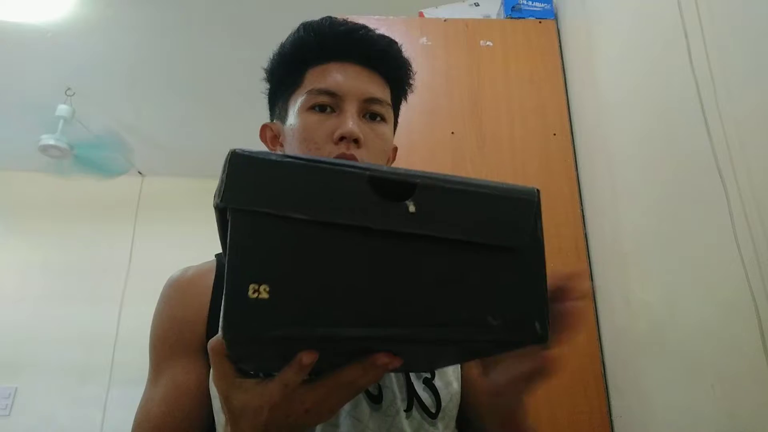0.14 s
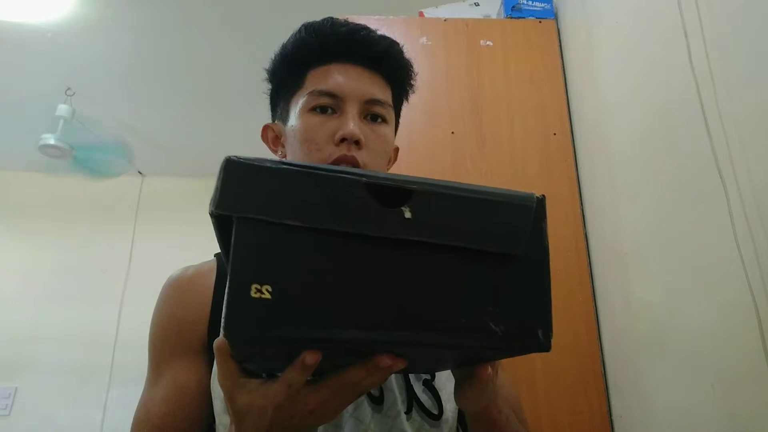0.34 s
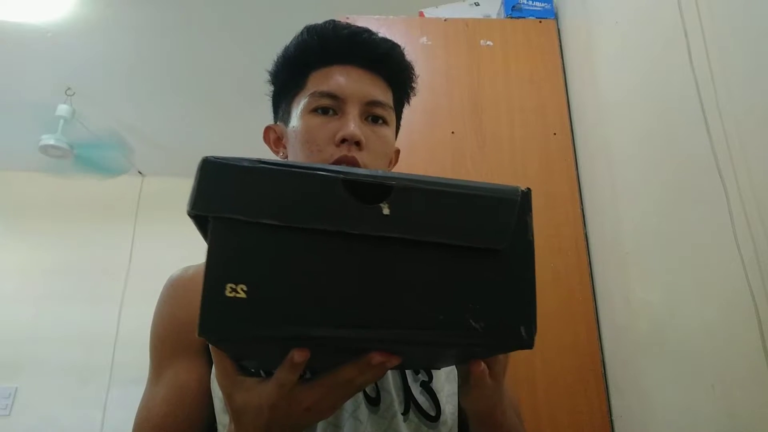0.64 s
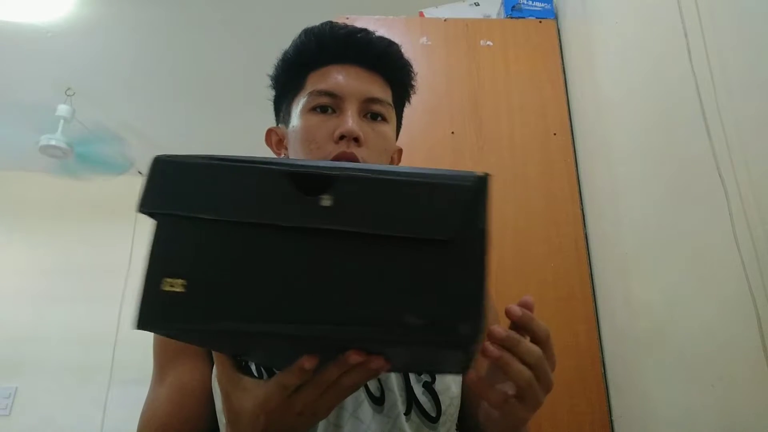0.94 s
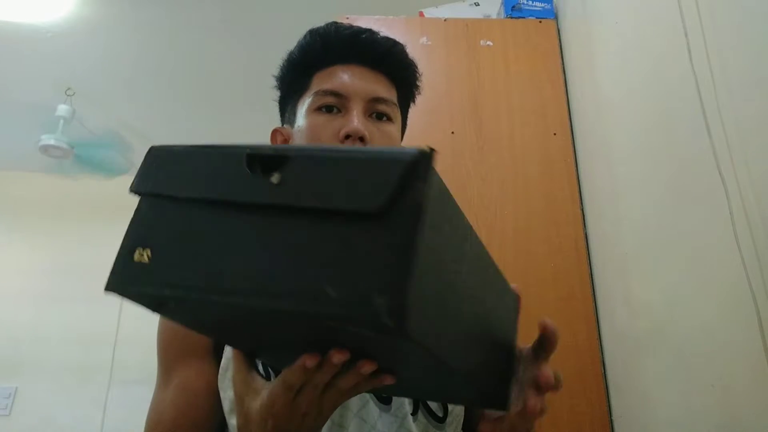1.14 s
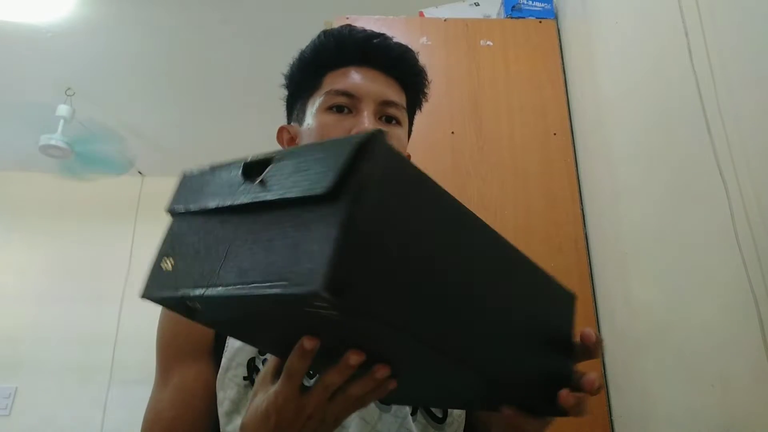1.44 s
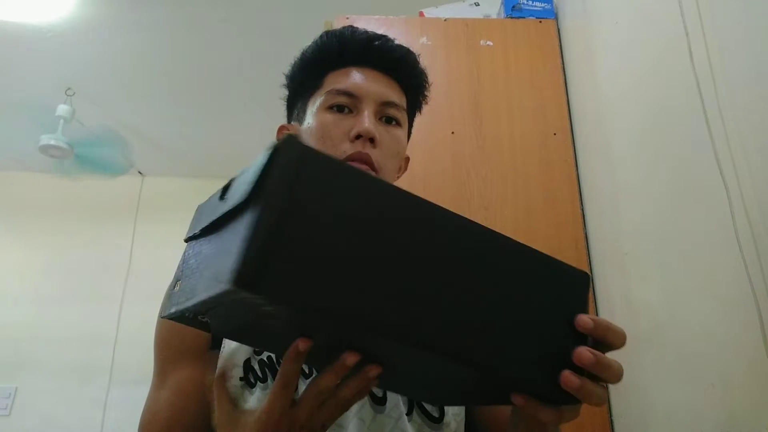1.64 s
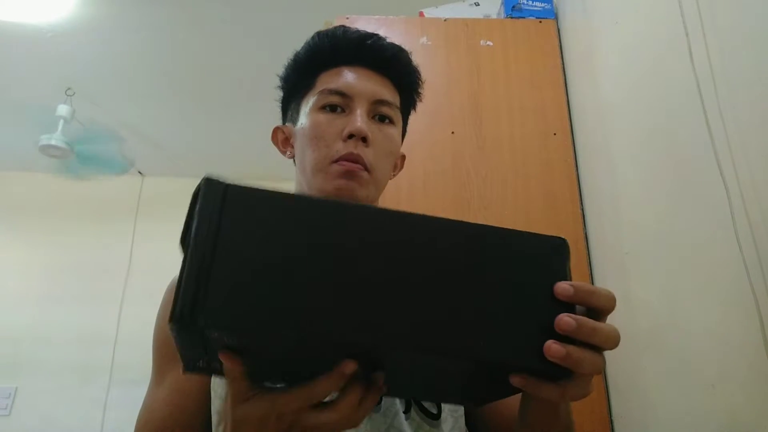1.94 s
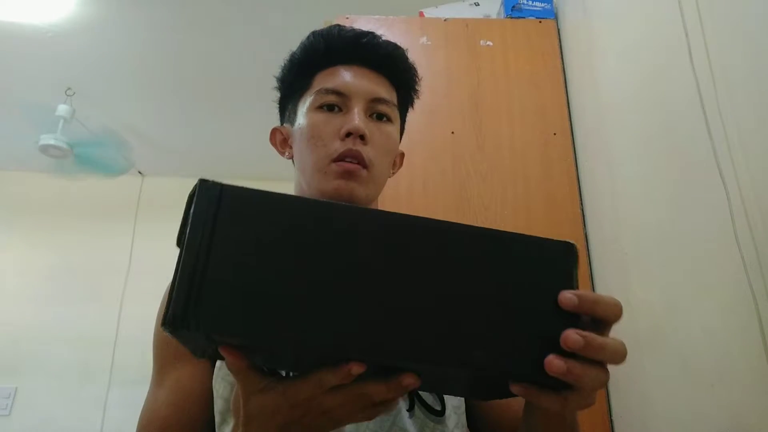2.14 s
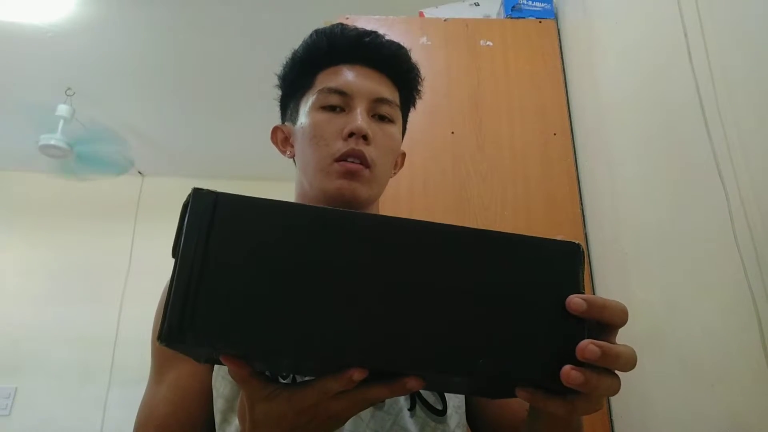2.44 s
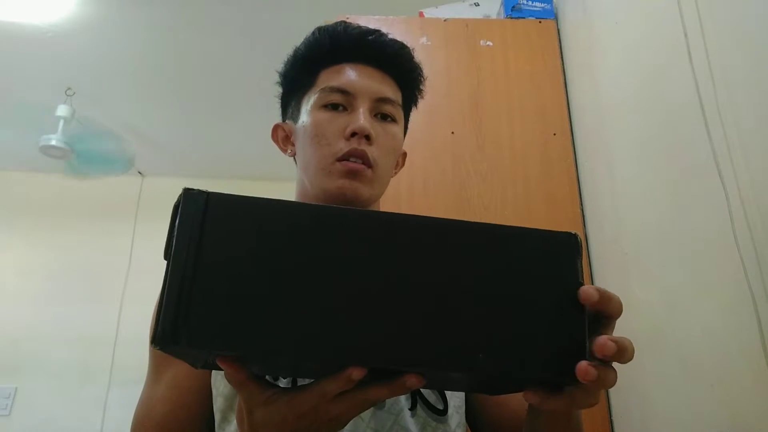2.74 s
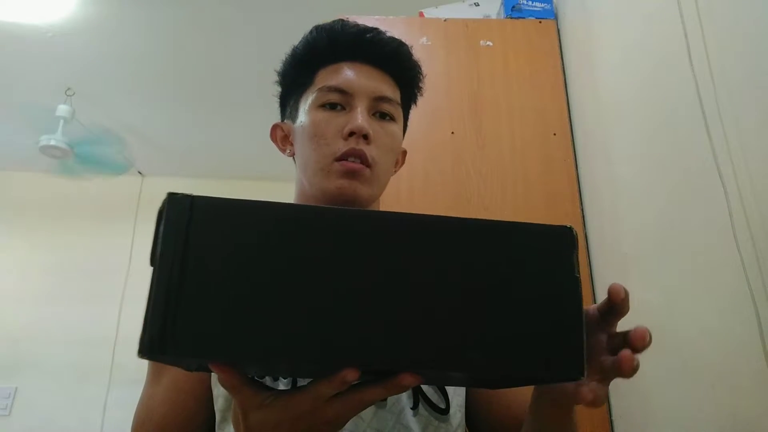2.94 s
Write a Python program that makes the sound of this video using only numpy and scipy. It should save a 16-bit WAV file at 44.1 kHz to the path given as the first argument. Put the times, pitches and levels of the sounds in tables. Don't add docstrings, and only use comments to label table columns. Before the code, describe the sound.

A cardboard box gets a hollow slap and a bright lid click, followed by dull knocks, dry ticks and brief palm rubs, close-miked in a small room with constant low fan hum and soft air hiss.

```python
import sys
import numpy as np
from scipy import signal
from scipy.fft import rfft, irfft
from scipy.io import wavfile

SR = 44100
rng = np.random.default_rng(int(sys.argv[2]) if len(sys.argv) > 2 else 0)


def magnitude_from_level(level_db):
    exponent = np.asarray(level_db, float) / 20
    return 10 ** exponent


def to_wav(s):
    ch = np.atleast_2d(s).T
    pcm = np.round(np.clip(ch, -1, 1) * 32767)
    wavfile.write(sys.argv[1], SR, pcm.astype(np.int16))


N = 136710

# pitch_hz, t60_s
ROOM_T60 = [(200, 0.27), (1000, 0.18), (4000, 0.25), (12000, .15)]
# pitch_hz, density_db (per Hz)
RUMBLE = [(20, -16), (60, -14), (90, -3), (170, 0.6), (400, -4.5), (800, -9), (1500, -14), (2200, -48)]
# pitch_hz, density_db (per Hz)
HISS = [(820, -28), (1400, -3), (2040, -4.5), (2620, -1), (3120, -4.5), (6150, -18), (7920, -17),
        (12600, -40), (15800, -38)]
# cycles_per_turn, level_db
HUM = [(26, -41), (27, -45), (28, -52), (29, -40), (30, -21), (31, -42), (32, -42), (33, -39), (34, -39),
       (35, -46), (52, -55), (54, -56), (55, -43), (56, -53), (59, -49), (60, -42), (61, -47), (62, -51)]
# cycles_per_turn, level_db
BUZZ = [(89, -55), (90, -50), (91, -61), (118, -54), (120, -41), (123, -57), (149, -51), (151, -44),
        (152, -43), (154, -51), (178, -54), (179, -51), (180, -59), (210, -60), (212, -60), (239, -62),
        (241, -58), (269, -60), (270, -61), (271, -61), (272, -64), (298, -67), (301, -67), (331, -67)]
# pitch_hz, width_hz, level_db
HOUSING = [(106.9, 9.8, -41), (133.9, 23, -32.5), (232.7, 41, -42), (295.5, 40, -46.5), (480, 34, -46),
           (604.3, 60, -43.5), (864, 43, -58.5), (1082, 53, -53.5), (1310, 60, -60), (1642, 56, -57)]
# time_s, level_db
SHADE = [
    (0, 2),
    (.5, -1.9),
    (1.2, -1.4),
    (1.9, -0.64),
    (2.5, 1.05),
    (3.1, 1.5),
]
# time_s, level_db
RUB = [
    (0, -75),
    (1.26, -90),
    (1.32, -61),
    (1.55, -45.5),
    (1.8, -64.5),
    (1.97, -42),
    (2.15, -59),
    (2.35, -66),
    (3.1, -62),
]
# pitch_hz, density_db (per Hz)
RUB_COLOUR = [(1500, -16), (4000, 6), (6000, 0), (8200, 2.5), (10500, -3), (13000, -12), (15300, -10),
              (16500, -15)]
# pitch_hz, density_db (per Hz)
CRACK_COLOUR = [(500, 12), (2000, -1.5), (4500, 2.5), (6000, -6), (8000, 0.1), (10500, -9.5), (13000, -16),
                (15500, -14)]
# start_s, peak_db, centre_hz
TICKS = [(0.0555, -34, 5630), (0.159, -39, 7910), (0.7562, -47, 6690), (0.797, -41, 5100),
         (0.855, -42, 5870), (0.913, -35, 8200), (0.9264, -36, 7800), (1.295, -38, 5460),
         (1.313, -37, 5890), (1.3369, -34.5, 6800), (1.3867, -34, 5500), (1.5644, -37, 6920),
         (1.7794, -38, 5830), (1.8896, -32.5, 7400), (1.926, -36, 7740), (2.0282, -34, 7920),
         (2.0784, -34, 5700), (2.1344, -39, 7640), (2.198, -47, 5080), (2.2693, -25, 8700),
         (2.319, -35, 5380), (2.3715, -45, 5100), (2.6763, -36.5, 5320), (2.969, -38, 7600)]
# start_s, peak_db, pitch_hz
KNOCKS = [(0.344, -25, 610), (0.978, -22.5, 620), (1.049, -18.5, 602), (1.29, -20, 616), (1.401, -21, 910),
          (1.697, -22, 603), (1.773, -21.5, 647), (1.818, -16, 512), (1.834, -18, 608), (1.934, -19, 594),
          (2.039, -19.5, 600), (2.23, -20, 620)]
# start_s, length_s, pitch_hz, level_db
SQUEAKS = [
    (1.93, .012, 1700, -38),
    (1.966, 0.012, 1547, -28.5),
    (2.218, .02, 2540, -44),
]
# start_s, length_s, start_hz, end_hz, level_db
WHISTLES = [
    (2.21, .025, 11300, 12300, -60),
    (2.342, .012, 12300, 12000, -61),
    (2.365, .016, 12500, 12200, -62),
    (2.382, .04, 11600, 10800, -60),
]
# start_s, peak_db
SNAP_TICK = [
    (.4495, -13),
    (.4505, -16.5),
]
# start_s, peak_db
SNAP_RING = [
    (.4560, -18),
    (0.4581, -18),
    (.464, -32),
]
# pitch_hz, level_db, t60_s
LID = [(1065, -3.5, 0.08), (1315, -2, 0.06), (1640, 0.1, 0.04), (2283, -4, 0.088), (3370, -12, 0.052),
       (4300, -5, 0.052), (6290, -12, .05), (8269, -20, 0.044)]
# start_s, peak_db
SLAPS = [
    (.2872, -13.5),
    (.2882, -9),
    (.299, -11.5),
    (.326, -18.5),
]
# pitch_hz, level_db, t60_s
BOX = [(178, -5.5, 0.1), (249, -2.5, 0.11), (306.6, 0.5, 0.086), (475.6, -4.5, 0.079), (680, -11, 0.098),
       (880, -9, 0.13), (1137, -6.5, 0.084), (1397, -5.5, 0.056), (1954, -22, 0.055), (2630, -11.5, 0.062),
       (3130, -17, 0.082), (4490, -15.5, 0.064)]


def at_hz(points, hz):
    table_hz, value = np.array(points).T
    return np.interp(np.log(hz), np.log(table_hz), value)


def in_time(rows):
    return np.interp(np.arange(N) / SR, *np.transpose(rows))


def rms_one(x):
    return x / np.sqrt(np.mean(x ** 2) + 1e-20)


def drift(rate_hz):
    hop = 40
    pole = np.exp(-2 * np.pi * rate_hz * hop / SR)
    noise = rng.standard_normal(N // hop + 2002)
    slow = signal.lfilter([1], [1, -2 * pole, pole * pole], noise)[2000:]
    return np.interp(np.arange(N) / hop, np.arange(len(slow)), rms_one(slow))


def ring(force, pitch_hz, t60_s):
    radius = magnitude_from_level(-60 / (t60_s * SR))
    step = 2 * np.pi * pitch_hz / SR
    return signal.lfilter([0, np.sin(step)], [1, -2 * radius * np.cos(step), radius * radius], force + 1e-18)


def bands(x):
    edges = 20 * 2 ** np.arange(0, 9.9, 1 / 3)
    for low, high in zip(edges, edges[1:]):
        sos = signal.butter(2, [low, high], "band", fs=SR, output="sos")
        yield np.sqrt(low * high), signal.sosfilt(sos, x)


def colour(x, spectrum):
    hz = np.maximum(np.arange(N // 2 + 1) * SR / N, 1)
    inside = (hz > spectrum[0][0]) & (hz < spectrum[-1][0])
    return irfft(rfft(x) * magnitude_from_level(at_hz(spectrum, hz)) * inside, N)


def room(x):
    t = np.arange(N) / SR
    noise = rng.standard_normal(N)
    tail = sum(band * magnitude_from_level(-60 * t / at_hz(ROOM_T60, hz)) for hz, band in bands(noise))
    half = SR // 2
    late = tail[:half] * (t[:half] > 0.003)
    return magnitude_from_level(-8.5) * 0.13 * signal.fftconvolve(x, late)[:N]


def turbulence(spectrum, shared_db, own_db):
    together = shared_db * drift(6.2)
    noise = colour(rng.standard_normal(N), spectrum)
    return rms_one(sum(band * magnitude_from_level(together + own_db * drift(13.8)) for _, band in bands(noise)))


def moving_air():
    rumble = magnitude_from_level(-37.5) * turbulence(RUMBLE, shared_db=0.56, own_db=1.5)
    hiss = magnitude_from_level(-42.5) * turbulence(HISS, shared_db=1.17, own_db=0.75)
    return rumble + hiss


def rotor_tones(table, trim_db, waver_db):
    turns_per_s = 4.0087
    angle = 2 * np.pi * turns_per_s * np.arange(N) / SR
    out = np.zeros(N)
    for cycles, level_db in table:
        level = np.sqrt(2) * magnitude_from_level(level_db + trim_db + waver_db * drift(3.2))
        out += level * np.sin(cycles * angle + 2 * np.pi * rng.random())
    return out


def housing():
    out = np.zeros(N)
    for hz, width_hz, level_db in HOUSING:
        t60_s = np.log(1000) / np.pi / width_hz
        once = ring(rng.standard_normal(N), hz, t60_s)
        out += magnitude_from_level(level_db) * rms_one(ring(once, hz, t60_s))
    return out


def motor():
    hum = rotor_tones(HUM, trim_db=-0.17, waver_db=-0.27)
    buzz = rotor_tones(BUZZ, trim_db=-0.2, waver_db=1.5)
    return (hum + buzz + housing()) * magnitude_from_level(in_time(SHADE))


def impulses(rows, scatter_db=0):
    out = np.zeros(N)
    for start_s, peak_db in np.array(rows)[:, :2]:
        out[int(start_s * SR)] += magnitude_from_level(peak_db + scatter_db * rng.standard_normal())
    return out


def crack(rows, level_db, t60_s):
    fall = signal.lfilter([1], [1, -magnitude_from_level(-60 / (t60_s * SR))], impulses(rows) + 1e-18)
    return magnitude_from_level(level_db) * fall * rms_one(colour(rng.standard_normal(N), CRACK_COLOUR))


def struck(rows, modes):
    out = np.zeros(N)
    for hz, level_db, t60_s in modes:
        out += magnitude_from_level(level_db) * ring(impulses(rows, scatter_db=4.0), hz, t60_s)
    return out * magnitude_from_level(-7.5)


def rubbing():
    return magnitude_from_level(in_time(RUB)) * turbulence(RUB_COLOUR, shared_db=3.0, own_db=7.0)


def ticks():
    out = crack(TICKS, level_db=-3, t60_s=0.035)
    for start_s, peak_db, hz in TICKS:
        out += ring(impulses([(start_s, peak_db - 8.0)]), hz, 0.013)
    return out


def knocks():
    out = np.zeros(N)
    for start_s, peak_db, hz in KNOCKS:
        blow = impulses([(start_s, peak_db - 8.5)])
        out += sum(ring(blow, hz * ratio, 0.055) for ratio in (0.43, 0.72, 1, 1.25))
    return out


def squeaks():
    t = np.arange(N) / SR
    out = np.zeros(N)
    for start_s, length_s, hz, level_db in SQUEAKS:
        arch = np.sin(np.pi * np.clip((t - start_s) / length_s, 0, 1))
        tone = sum(magnitude_from_level(-5.0 * k) * np.sin(2 * np.pi * hz * (k + 1) * t) for k in range(4))
        out += magnitude_from_level(level_db) * arch * tone
    return out


def whistles():
    t = np.arange(N) / SR
    out = np.zeros(N)
    for start_s, length_s, start_hz, end_hz, level_db in WHISTLES:
        share = np.clip((t - start_s) / length_s, 0, 1)
        phase = 2 * np.pi * np.cumsum(start_hz + (end_hz - start_hz) * share) / SR
        out += magnitude_from_level(level_db) * np.sin(np.pi * share) * np.sin(phase)
    return out


def lid_snap():
    return struck(SNAP_RING, LID) + crack(SNAP_TICK + SNAP_RING, level_db=-4.5, t60_s=0.012)


def slap():
    return struck(SLAPS, BOX) + crack(SLAPS, level_db=-4.5, t60_s=0.012)


def scene():
    fan = moving_air() + motor()
    handling = rubbing() + ticks() + knocks() + squeaks() + whistles()
    box = handling + lid_snap() + slap()
    return (fan + box + room(box))[None]


def top_cut(x):
    return signal.sosfilt(signal.butter(12, 15920, fs=SR, output="sos"), x)


def record(dry):
    return top_cut(dry)


dry = scene()
out = record(dry)
to_wav(out)
```